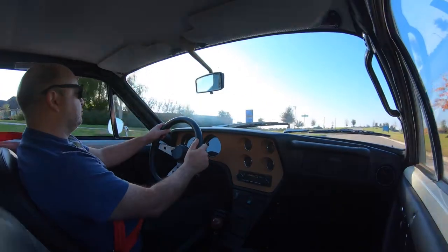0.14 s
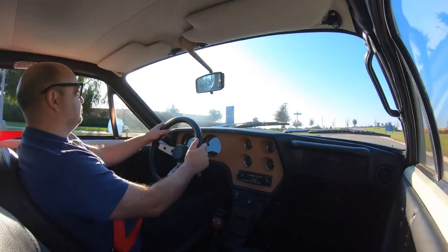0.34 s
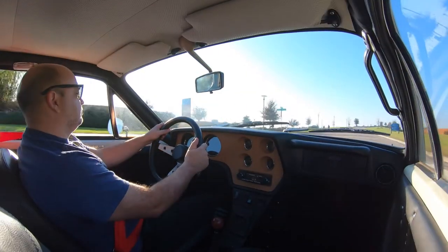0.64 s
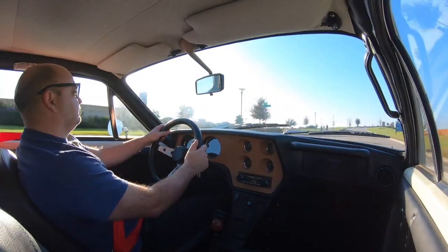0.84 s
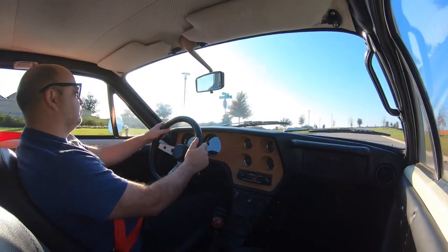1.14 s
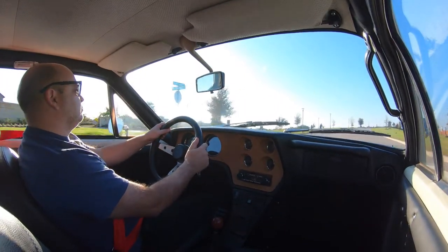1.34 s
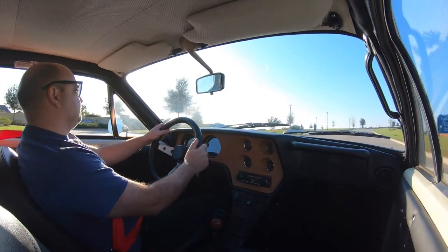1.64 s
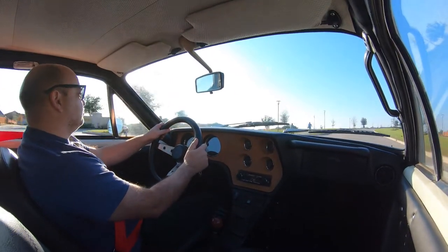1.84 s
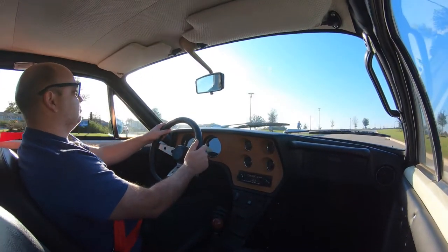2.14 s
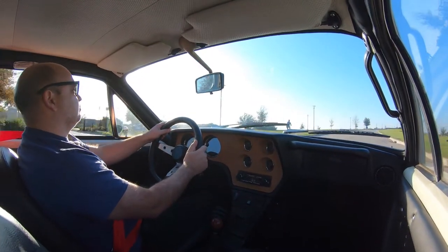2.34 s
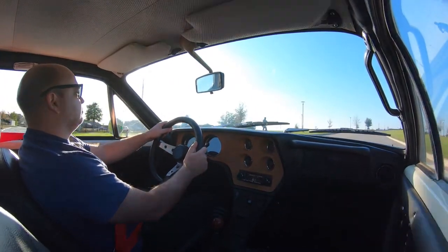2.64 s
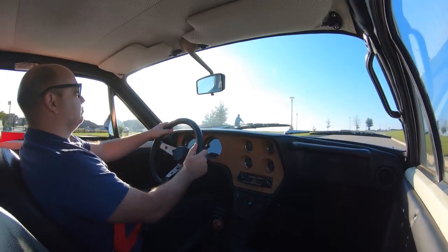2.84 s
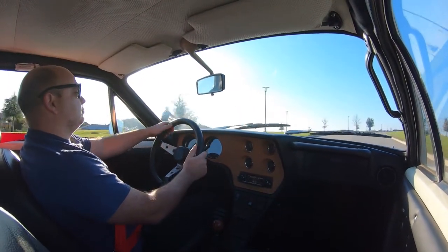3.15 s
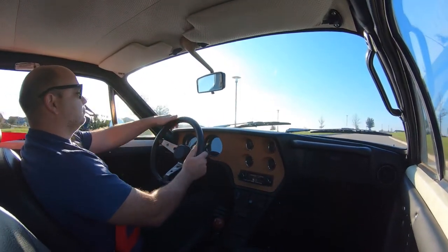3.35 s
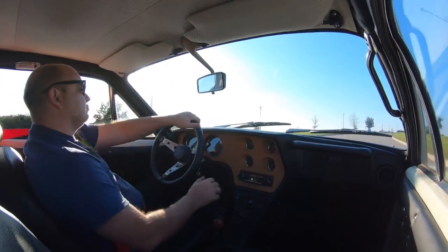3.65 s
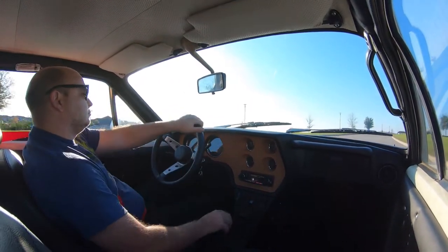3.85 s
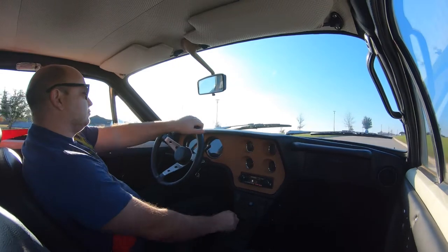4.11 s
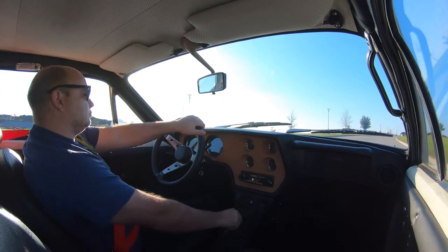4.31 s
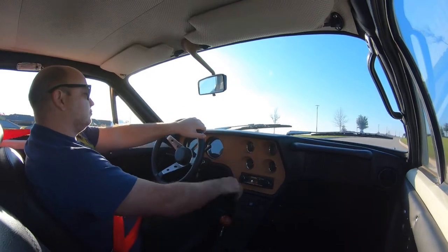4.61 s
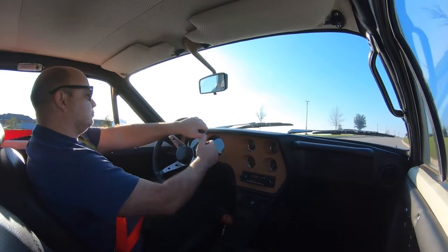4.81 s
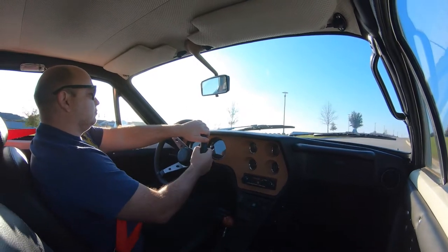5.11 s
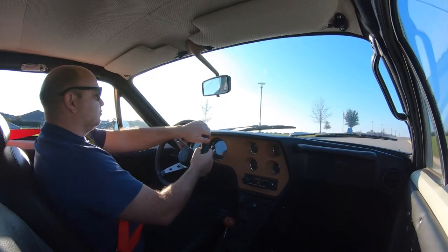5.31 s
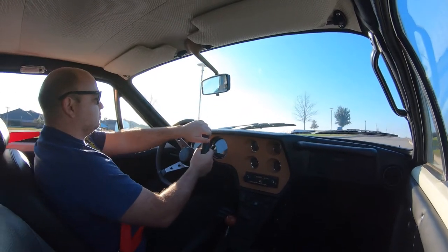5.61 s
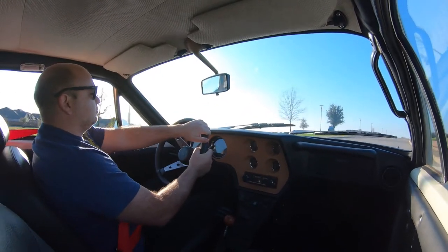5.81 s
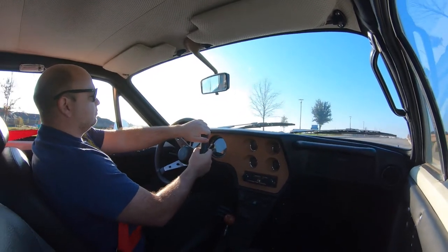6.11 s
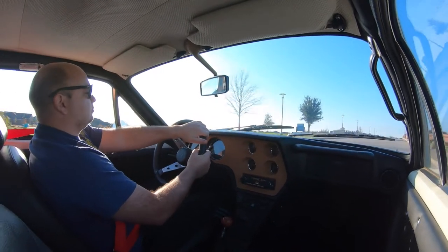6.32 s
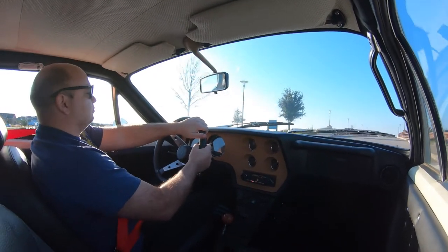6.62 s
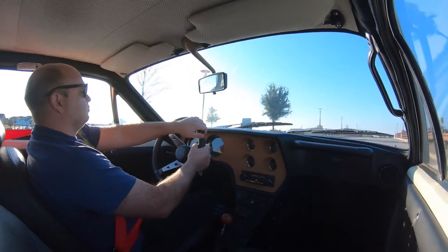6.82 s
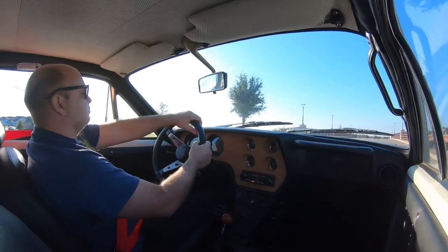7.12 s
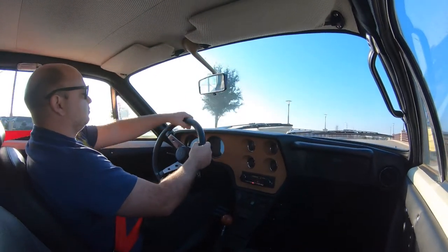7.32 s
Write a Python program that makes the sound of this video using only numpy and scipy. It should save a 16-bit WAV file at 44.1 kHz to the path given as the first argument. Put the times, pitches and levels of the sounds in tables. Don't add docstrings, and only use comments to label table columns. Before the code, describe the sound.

Inside a vintage car on a road, a rough four-cylinder engine drones low and steady over boomy bumps, tyre roar and airy hiss. Around two seconds the throttle closes with a brief panel buzz and the note sinks slightly. Past four seconds the linkage knocks, the revs jump through a downshift, peak, then slowly fall under engine braking. Close cabin microphone, dense and slightly overloaded, with bass held down.

```python
import sys
import numpy as np
from scipy import signal
from scipy.fft import rfft, irfft, next_fast_len
from scipy.io import wavfile
from scipy.ndimage import uniform_filter1d, map_coordinates

SR = 44100
rng = np.random.default_rng(int(sys.argv[2]) if len(sys.argv) > 2 else 0)


def store_wav(level_fs):
    pcm = np.round(np.clip(np.atleast_2d(level_fs), -1, 1) * 32767)
    wavfile.write(sys.argv[1], SR, pcm.T.astype(np.int16))


def invert_db(x):
    u = np.asarray(x, float) / 20
    return 10 ** u


N = 328986
FIRINGS_PER_CYCLE = 4

# [t/s, firing f/Hz, firing level/dB, effort/dB]
ENGINE_RUN = [(0.0, 87.45, -18.5, 2), (1.75, 88.5, -20, 1), (2.05, 88.1, -17.5, 1.5),
              (2.3, 87.7, -24.5, 0.5), (2.75, 86.2, -15, -0.5), (3.3, 85.36, -19.5, -0.5),
              (4.0, 82.53, -16, -1), (4.2, 79.5, -23.5, -0.5), (4.32, 85.86, -17, -.5),
              (4.5, 98.1, -26.5, 0.5), (4.63, 99.9, -28.5, -1), (4.8, 98.1, -19, -.5),
              (5.03, 101.6, -17, .5), (5.36, 115.2, -11, 2.5), (5.62, 112.9, -12, 1),
              (6.05, 111.1, -14.5, 0), (6.6, 107.8, -15.5, 0.5), (7.46, 102.7, -20, -.5)]
# [t/s, state: 0 pulling, 1 coasting, 2 clutch in and blip, 3 engine braking]
DRIVING_STATE = [(0, 0), (1.99, 0), (2.2, 1), (4.25, 1), (4.44, 2), (4.73, 2), (4.86, 3), (7.46, 3)]
# [order of the cycle, level/dB re state level]
PULLING_ORDERS = [(1, -14), (2, -4), (3, -20), (5, -13), (6, -10), (7, -15), (9, -9), (10, -19), (11, -15),
                  (13, -32), (14, -28), (15, -19), (16, -20), (17, -22), (19, -32), (20, -32)]
COASTING_ORDERS = [(1, -16), (2, -5), (3, -24), (5, -16), (6, -19), (7, -30), (9, -36), (10, -26),
                   (11, -26), (13, -33), (14, -34), (15, -36), (16, -32), (17, -40), (19, -29), (20, -32)]
BLIP_ORDERS = [(1, -8), (2, -13), (3, -28), (5, -33), (6, -16), (7, -26), (9, -21), (10, -25), (11, -33),
               (13, -30), (14, -42), (15, -34), (16, -29), (17, -40), (19, -42), (20, -44)]
BRAKING_ORDERS = [(1, -13), (2, -13), (3, -26), (5, -25), (6, -29), (7, -19), (9, -19), (10, -30),
                  (11, -34), (13, -33), (14, -36), (15, -25), (16, -34), (17, -36), (19, -45), (20, -35)]
STATE_LEVEL_DB = [-20, -19, -17, -17]
STATE_FIRING_HZ = [88, 85.5, 100, 107.5]
RULED_ORDERS = [
    4,
    8,
    12,
    18,
    60,
]
# [order, level/dB]
HIGH_ORDERS = [(24, -49), (25, -53.5), (26, -58.5), (28, -54.5), (36, -56.5)]
# [t/s, length/s, panel level/dB, neighbour order level/dB]
PANEL_RATTLE = (1.914, 0.19, 11.2, 6)


def engine(t):
    rate_hz = columns(ENGINE_RUN, t)[0] * (1 + 0.0015 * drift(6, t))
    cycle = 2 * np.pi * np.cumsum(rate_hz) / SR / FIRINGS_PER_CYCLE
    slow = t[::128]
    firing_hz, firing_db, _ = columns(ENGINE_RUN, slow)
    state, = columns(DRIVING_STATE, slow)

    levels = {}
    for rows in zip(PULLING_ORDERS, COASTING_ORDERS, BLIP_ORDERS, BRAKING_ORDERS):
        order = rows[0][0]
        state_db = [db + base_db for (_, db), base_db in zip(rows, STATE_LEVEL_DB)]
        usual_db = lift_db(order * np.array(STATE_FIRING_HZ) / FIRINGS_PER_CYCLE, CABIN_AIR_MODES)
        now_db = lift_db(order * firing_hz / FIRINGS_PER_CYCLE, CABIN_AIR_MODES)
        levels[order] = by_state(state, state_db) + now_db - by_state(state, usual_db)
    rattle_s, length_s, _, neighbour_db = PANEL_RATTLE
    for order in (17, 19):
        levels[order] += neighbour_db * swell(slow, rattle_s, length_s)
    levels.update(zip(RULED_ORDERS, ruled_levels(slow, firing_hz, firing_db, state)))
    levels.update(HIGH_ORDERS)

    tones = np.zeros((2, N))
    for order, db in levels.items():
        waver = order ** 0.31
        phase = order * cycle + 2 * np.pi * rng.random() + 0.082 * waver * drift(7, t)
        hz = order * firing_hz.mean() / FIRINGS_PER_CYCLE
        apart = np.arccos(np.clip(read(PORT_LIKENESS, hz), -1, 1)) * np.array([[0.25], [-0.25]])
        gain = np.interp(t, slow, invert_db(db + 0.62 * waver * drift(16, slow)))
        tones += np.sqrt(2) * gain * np.cos(phase + apart)
    return tones, cycle


SECOND_MULTIPLE_DB = [-34.5, -40, -27, -40.5]
THIRD_MULTIPLE_DB = [-28.5, -42, -37, -38]
PANEL_STATE_DB = [-52, -47.5, -52, -52.5]
# [f/Hz, width/Hz, level/dB]
PANEL_RESONANCE = [(393.6, 51, 11.5)]
# [t/s, length/s, level/dB]
PANEL_QUIET = (2.27, 0.094, -6)
# [f/Hz, width/Hz, level/dB]
DYNAMO_MODES = [(1492, 19, 16.74), (1578, 16, 15), (1684, 46, 15)]


def ruled_levels(t, firing_hz, firing_db, state):
    *_, panel_hz, whine_hz = (order * firing_hz / FIRINGS_PER_CYCLE for order in RULED_ORDERS)
    rattle_s, rattle_length_s, rattle_db, _ = PANEL_RATTLE
    quiet_s, quiet_length_s, quiet_db = PANEL_QUIET
    panel_db = by_state(state, PANEL_STATE_DB) + lift_db(panel_hz, PANEL_RESONANCE)
    panel_db += rattle_db * swell(t, rattle_s, rattle_length_s)
    panel_db += quiet_db * swell(t, quiet_s, quiet_length_s)
    whine_db = -66.5 + lift_db(whine_hz, DYNAMO_MODES)
    second_db, third_db = by_state(state, SECOND_MULTIPLE_DB), by_state(state, THIRD_MULTIPLE_DB)
    return firing_db, second_db, third_db, panel_db, whine_db


# [f/Hz, width/Hz, level/dB]
CABIN_AIR_MODES = [(185, 35, 1.5), (234.7, 17, 11), (404, 24, 4)]


def lift_db(hz, modes):
    return sum(db / (1 + (2 * (hz - f) / width) ** 2) for f, width, db in modes)


# [t/s, peak level/dB, length/s]
ROAD_BUMPS = [(0.205, -16.1, 0.15), (0.534, -14, 0.21), (0.637, -13, 0.15), (0.922, -15.1, 0.13),
              (1.025, -11, 0.05), (1.23, -15, 0.22), (1.324, -18, 0.04), (1.413, -15.3, 0.05),
              (1.552, -13, 0.11), (1.672, -18.5, 0.05), (1.884, -16.1, 0.07), (2.119, -13, 0.084),
              (2.214, -18.5, 0.088), (2.42, -15.5, 0.33), (2.8, -16.8, 0.08), (2.915, -17.0, 0.07),
              (3.139, -14, 0.06), (3.268, -26, 0.083), (3.392, -18.5, 0.24), (3.637, -13, 0.06),
              (3.871, -23.5, 0.14), (4.803, -21, 0.05), (4.979, -19.5, 0.12), (5.178, -16, 0.094),
              (5.588, -15.5, 0.19), (5.771, -18, 0.3), (5.875, -20, 0.05), (6.115, -19.3, 0.093),
              (6.354, -15.5, 0.12), (7.149, -17, 0.18)]
# [f/Hz, width/Hz, level/dB]
CABIN_BOOM_MODES = [(29, 9.1, 7), (42.4, 10, 2.5), (21.6, 13, -3.5)]
# [t/s, f/Hz, level/dB]
DRIVELINE_SHUDDER = [(4.0, 33.93, -68.5), (4.1, 32.3, -24), (4.22, 31.3, -14.5), (4.3, 31.9, -19),
                     (4.39, 28.9, -14), (4.58, 26.24, -14), (4.72, 29, -14), (4.78, 30.5, -27),
                     (4.85, 29.8, -66.5)]


def boom(t):
    smooth_road_db, bump_spread, shortest_s = -22.5, 0.43, 0.048
    slow = t[::128]
    power = invert_db(smooth_road_db) ** 2
    for s, db, length_s in ROAD_BUMPS:
        power = power + invert_db(db) ** 2 * swell(slow, s, bump_spread * max(length_s, shortest_s))
    level = np.interp(t, slow, np.sqrt(power))

    ring = 0
    for hz, width, db in CABIN_BOOM_MODES:
        ring = ring + invert_db(db) * evened(resonate(rng.standard_normal(N), np.full(N, hz), width))
    size = np.sqrt(uniform_filter1d(np.abs(ring) ** 2, 1500) + 0.05)
    ring = evened(ring / size) * np.sqrt(2)

    hz, db = columns(DRIVELINE_SHUDDER, t)
    shudder = np.sqrt(2) * invert_db(db) * np.exp(2j * np.pi * np.cumsum(hz) / SR)
    yielded_db = 13 * np.clip((db + 43) / 20, 0, 1)
    both = level * invert_db(-yielded_db) * ring + shudder
    return both.real + 0.04 * both.imag * np.array([[1], [-1]])


# [t/s, f/Hz, peak level/dB, t60/s]
BODY_KNOCKS = [(1.199, 1150, -29, .04), (4.05, 240, -26, .5), (4.28, 268, -25, .35), (4.3, 405, -32, .3),
               (4.395, 3300, -45, .05)]


def knocks(t):
    out = np.zeros(N)
    for s, hz, db, t60_s in BODY_KNOCKS:
        u = np.clip(t - s, 0, 2)
        rise = 1 - np.exp(-u * hz / 4)
        out += invert_db(db - 60 * u / t60_s) * rise * np.sin(2 * np.pi * hz * u)
    return out


# [t/s, peak level/dB, left minus right/dB]
TRIM_TICKS = [(1.8997, -51, 1), (2.3902, -34.5, 3), (2.3954, -50, -4), (2.4074, -52, -4),
              (2.4874, -52.5, 4), (6.72, -56, -6), (7.006, -43, 0), (7.3183, -45.5, 3)]
# [f/Hz, width/Hz, level/dB]
TRIM_MODES = [(7900, 1200, 0), (10000, 900, -1), (13500, 1200, -19), (5200, 1200, -9)]


def ticks():
    length = 900
    out, t = np.zeros((2, N + length)), np.arange(length) / SR
    for s, peak_db, lean_db in TRIM_TICKS:
        burst = rng.standard_normal((2, length)) * invert_db(-60 * t / 0.02)
        ring = 0
        for hz, width, db in TRIM_MODES:
            ring = ring + invert_db(db) * resonate(burst, np.full(length, hz), width).real
        gain = invert_db(peak_db + 0.5 + np.array([[lean_db / 2], [-lean_db / 2]]))
        start = round(s * SR)
        out[:, start:start + length] += gain * ring / np.abs(ring).max()
    return out[:, :N]


# [f/Hz, level/dB per Hz]
ROAR_SPECTRUM = [(250, -26.5), (430, -3.5), (553, -2.5), (617, -9.5), (742, -1.5), (835, -7.5), (908, -10),
                 (1060, -11), (1180, -7), (1420, -14.5), (1780, -14.5), (2070, -18.5), (3200, -24),
                 (4160, -51), (7040, -120)]


def roar(cycle, effort_db, throb):
    roar_db = -37 + effort_db
    noise = wash(ROAR_SPECTRUM, roar_db, patch_db=1.0, flicker_db=0.01, size=1024)
    return panels(noise * throb + clatter(cycle, roar_db - 7.5))


def clatter(cycle, level_db):
    pattern = uniform_filter1d(rng.standard_normal((2, 40, 2048)), 3, 1)
    turns = cycle / (2 * np.pi)
    where = [turns / 5.5 % 39, turns % 1 * 2047]
    rattle = np.array([map_coordinates(p, where, order=1) for p in pattern])
    rattle[1] += 1.5 * rattle[0]
    size = next_fast_len(N)
    colour = invert_db(read(ROAR_SPECTRUM, np.fft.rfftfreq(size, 1 / SR)))
    return invert_db(level_db) * evened(irfft(rfft(rattle, size) * colour, size)[:, :N])


# [f/Hz, width/Hz, level/dB]
PANEL_LIFTS = [(740.6, 38, 3.5), (905, 56, 5), (1090, 63, -1), (540, 91, 0.5)]


def panels(x):
    lifted = x
    for hz, width, db in PANEL_LIFTS:
        lifted = lifted + (invert_db(db) - 1) * 2 * resonate(x, np.full(N, hz), width).real
    return lifted


# [f/Hz, level/dB]
DRUM_SPECTRUM = [(45, -11), (60, 0.5), (100, 2), (150, -7.5), (200, -8.5), (300, -11.5), (350, -16.5),
                 (410, -13.5), (450, -24), (600, -59), (900, -120)]
DRUM_OFFSET_DB = [0.2, 0.59, -0.5, -0.62]


def drumming(t, effort_db):
    state, = columns(DRIVING_STATE, t)
    level_db = -24 + by_state(state, DRUM_OFFSET_DB) + 0.4 * effort_db + 0.6 * drift(3.5, t)
    return wash(DRUM_SPECTRUM, level_db, patch_db=0.03, flicker_db=1.46, size=2048)


# [f/Hz, level/dB per Hz]
HISS_SPECTRUM = [(1650, -22), (2800, -9), (3220, -5), (4280, -8.5), (4670, -8), (5590, -9), (7830, -11.5),
                 (8500, -17), (9900, -19.5), (10500, -22.5), (11300, -35), (12500, -35), (14200, -39.5),
                 (15000, -53.5), (22000, -120)]


def hiss(t, effort_db, throb):
    level_db = -54.5 + 1.1 * effort_db + 0.45 * drift(11, t)
    return wash(HISS_SPECTRUM, level_db, patch_db=0.5, flicker_db=0.43, size=512) * throb


# [f/Hz, correlation]
PORT_LIKENESS = [(60, 0.97), (96, 1.0), (150, 1), (250, 0.97), (400, 1), (630, 0.51), (1020, 0.23),
                 (1630, -0.081), (2610, 0.55), (4190, 0.41), (6720, -0.04), (10800, 0.17)]
# [f/Hz, left minus right/dB]
PORT_LEAN = [(60, 1), (110, -0.5), (190, -3), (340, 1), (600, -0.5), (1070, -2.0), (1910, 0.5),
             (3400, -0.5), (6050, -4.5), (10800, 5)]
# [f/Hz, left lead/rad]
PORT_LEAD = [(0, 0), (430, 0.0), (780, -1.0), (1120, 0.4), (3270, -0.1), (4310, 0.4), (4650, 0.3),
             (5680, -3.6), (6290, -1.5), (7240, -2.1), (7670, -7.2), (8180, -9.7), (9300, -7.2),
             (10900, -7.1)]


def wash(spectrum, level_db, patch_db, flicker_db, size):
    hop, hz = size // 4, np.fft.rfftfreq(size, 1 / SR)
    frames = N // hop + 5
    a, b, c, d, patches = rng.standard_normal((frames, len(hz), 5)).T
    patches = uniform_filter1d(patches, size // 64, 0)
    patches = evened(uniform_filter1d(patches, 3072 // hop, 1))

    same = np.clip(read(PORT_LIKENESS, hz), -1, 1)[:, None]
    left = a + 1j * b
    right = same * left + np.sqrt(1 - same ** 2) * (c + 1j * d)
    right = right * np.exp(-1j * read(PORT_LEAD, hz))[:, None]
    lean = invert_db(read(PORT_LEAN, hz) / 2)[:, None]

    flicker = flicker_db * drift(17, np.arange(frames) * hop / SR)
    shape = invert_db(read(spectrum, hz)[:, None] + patch_db * patches + flicker)
    bins = np.array([left * lean, right / lean]) * shape
    noise = signal.istft(bins, nperseg=size, noverlap=size - hop)[1][:, :N]
    return invert_db(level_db) * noise / np.sqrt(np.mean(noise.mean(0) ** 2))


def evened(x):
    return x / np.sqrt(np.mean(np.abs(x) ** 2) + 1e-20)


def read(points, hz):
    f, value = np.transpose(points)
    return np.interp(np.log(hz + 1), np.log(f + 1), value)


def columns(rows, t):
    s, *values = np.transpose(rows)
    return [np.interp(t, s, v) for v in values]


def by_state(state, values):
    return np.interp(state, range(len(values)), values)


def swell(t, s, length_s):
    return np.exp(-((t - s) / length_s) ** 2)


def drift(fastest_hz, t):
    hz = np.geomspace(fastest_hz / 8, fastest_hz, 24)[:, None]
    grid = np.arange(0, N / SR + 0.1, 0.005)
    wave = np.sin(2 * np.pi * (hz * grid + rng.random(hz.shape))) / hz ** 0.38
    return np.interp(t, grid, evened(wave.sum(0)))


def resonate(x, hz, width):
    turn = np.exp(2j * np.pi * np.cumsum(hz) / SR)
    r = np.exp(-np.pi * width / SR)
    return turn * signal.lfilter([(1 - r) ** 2], [1, -2 * r, r * r], x / turn)


def scene():
    t = np.arange(N) / SR
    tones, cycle = engine(t)
    effort_db = columns(ENGINE_RUN, t)[-1]
    throb_db = 0.36 * np.cos(cycle) + 0.22 * np.cos(2 * cycle) + 0.16 * np.cos(FIRINGS_PER_CYCLE * cycle)
    throb = invert_db(throb_db)
    near = tones + boom(t) + knocks(t) + ticks()
    return near + roar(cycle, effort_db, throb) + drumming(t, effort_db) + hiss(t, effort_db, throb)


def low_pass(x):
    return signal.sosfilt(signal.butter(12, 14966, fs=SR, output="sos"), x)


def record(dry):
    bass = signal.oaconvolve(dry, signal.firwin(3001, 150, fs=SR)[None], "same")
    power = uniform_filter1d(uniform_filter1d((bass ** 2).mean(0), 1200), 1200)
    power_db = 10 * np.log10(power + 1e-9)
    ducked = bass * invert_db(-0.55 * (power_db + 15.5) + np.array([[-0.2], [0.2]]))
    left_s = np.arange(N)[::-1] / SR
    settle = 1 - 0.6 * np.exp(-left_s / 0.002)
    mix = 0.75 * np.tanh(settle * (dry - bass + ducked) / 0.67)
    return low_pass(mix)


dry = scene()
out = record(dry)
store_wav(out)
```